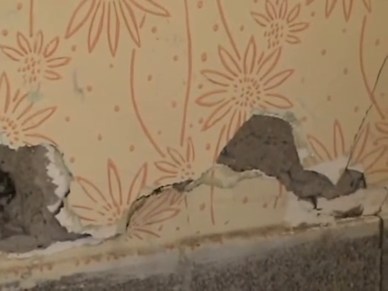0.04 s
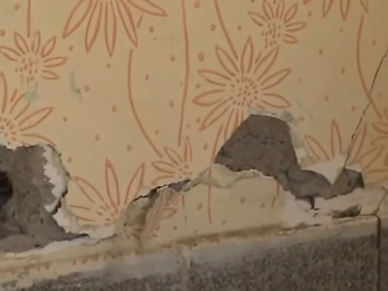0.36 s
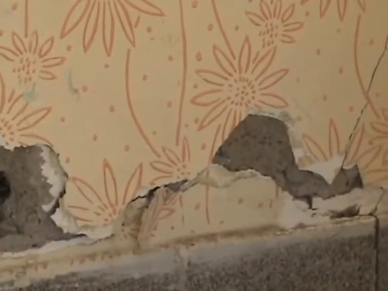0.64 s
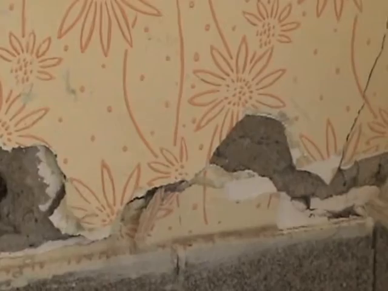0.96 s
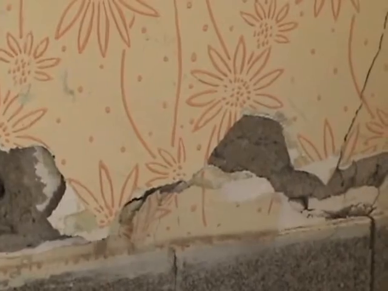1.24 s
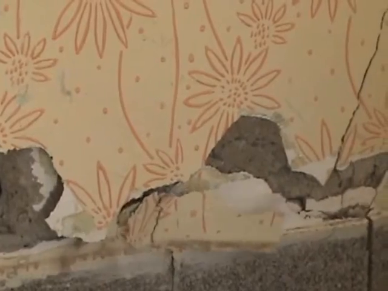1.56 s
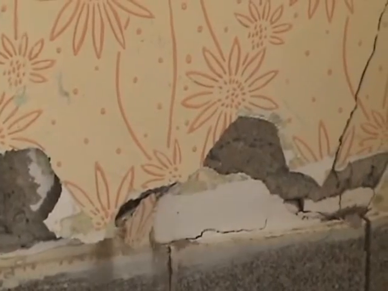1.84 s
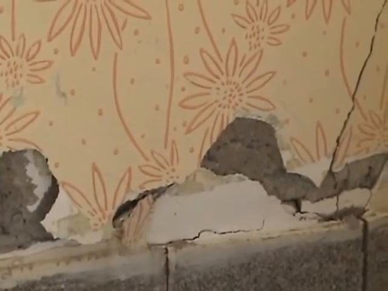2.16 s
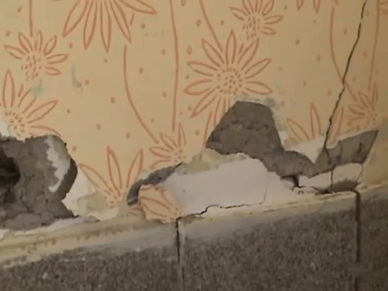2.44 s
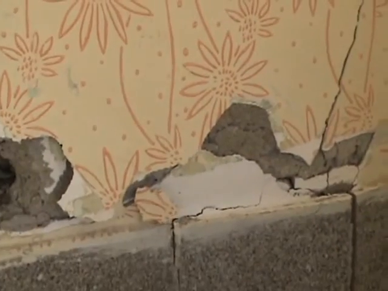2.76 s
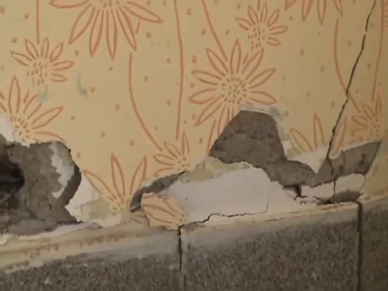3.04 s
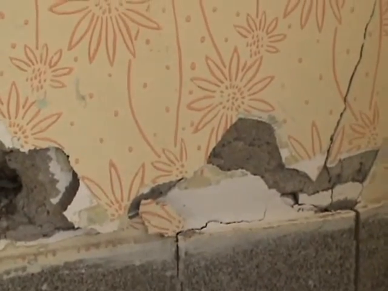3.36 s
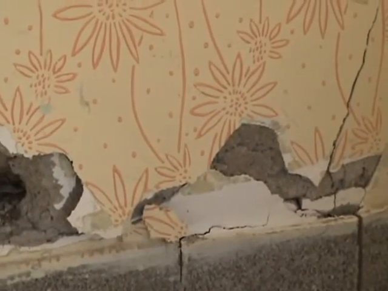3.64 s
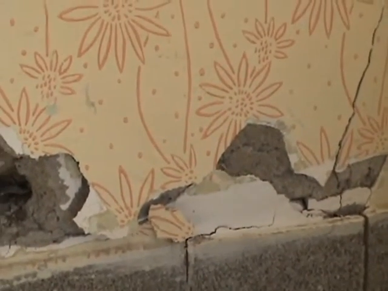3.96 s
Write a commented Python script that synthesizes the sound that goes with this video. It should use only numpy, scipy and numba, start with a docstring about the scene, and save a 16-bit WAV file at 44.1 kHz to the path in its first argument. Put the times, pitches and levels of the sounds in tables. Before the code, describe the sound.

A power chisel hammers plaster off a wall from the start, close by in a small bare room, its fast, even blows thumping, cracking and rattling. At about 2 seconds the blows stop, leaving a quieter motor whine and rush of air. After an instant of silence at 2.3 seconds, the hammering returns with deeper thumps and a brighter steel rattle, continuing to the end at about 4 seconds.

```python
"""Power chisel on plaster

Close to the microphone in a small bare room, a power chisel breaks plaster off a wall, about 26 blows a second.
Each blow thumps the wall, cracks the plaster and sets the steel bit rattling. The blows stop and the motor
whines on; then the scene changes, and the hammering is at another spot, deeper and more metallic."""
import sys
import numpy as np
from scipy import signal
from scipy.fft import rfft, irfft
from scipy.io import wavfile
from scipy.ndimage import uniform_filter1d
from numba import njit

SR = 44100
rng = np.random.default_rng(int(sys.argv[2]) if len(sys.argv) > 2 else 0)


def transcribe(u):
    """Save the signal u as a 16-bit wav file named by the first command-line argument.

    u: samples, shape (n,) or (channels, n), limited to [-1, 1]; the rate is SR.
    q: integer samples, one column per channel.
    """
    v = np.clip(np.atleast_2d(u).T, -1, 1)
    q = np.round(v * 32767).astype(np.int16)
    wavfile.write(sys.argv[1], SR, q)


N = 176400
LEAD = SR // 2  # the tool is already running when the scene opens
T = np.arange(-LEAD, N) / SR


# pace of the piston at the first spot (time [s], rate [blows/s])
FIRST_RATE = [(0, 25.8), (.7, 25.7), (1.0, 25.45), (1.35, 25.4), (1.62, 25.7), (1.8, 25.2), (1.95, 24.2)]
# strength of the blows there (time [s], thump [dB], crack [dB], rattle [dB])
FIRST_LEVELS = [(0, -17.5, -15.5, -25.5), (.55, -21, -16, -27), (.95, -14, -14.5, -27),
                (1.2, -15, -17, -27.5), (1.35, -16.5, -17, -24), (1.84, -15.5, -17, -25),
                (1.91, -19, -17.5, -20), (1.97, -25, -15.5, -28)]

def first_spell(stop_s=1.96):
    """Hard, even blows on plaster that booms more as it loosens; the bit rebounds once a stroke."""
    strokes = stroke_count(FIRST_RATE, beat_s=.030)
    running = T < stop_s
    thump_gain, crack_gain, rattle_gain = (undb(curve(FIRST_LEVELS, k)) * running for k in (1, 2, 3))
    hits = blows(strokes, jitter_s=.00017, scatter_db=1)
    cracks = blows(strokes, jitter_s=.0002, scatter_db=1.3)
    rebound = blows(strokes, jitter_s=.0005, scatter_db=7.5, delay=.4)
    thump = loosening_thump(hits + undb(-14) * rebound) * thump_gain
    grit = chatter(strokes, peak_at=.82, depth_db=0, grain_db=1.5)
    crack = plaster_crack(cracks + undb(-4) * rebound + undb(-7.5) * grit, FIRST_CRACK) * crack_gain
    sheet = sheet_ring(cracks + rebound) * running
    clack = tip_clack(strokes) * running
    contacts = unit(chatter(strokes, peak_at=.65, depth_db=7, grain_db=2.5) + undb(-7) * cracks)
    rattle = bit_rattle(contacts, FIRST_RATTLE, BIT_MODES[:3], ring_db=-10.5) * rattle_gain
    return (undb(1.5) * room(soften(thump), early_db=-7.5, late_db=-8.5, side_db=-7.5)
            + room(crack, early_db=7.5, late_db=4.5, side_db=-8.5)
            + room(soften(sheet), early_db=1.5, late_db=-11, side_db=-10)
            + room(soften(clack), early_db=-16.5, late_db=-6.5, side_db=-7)
            + undb(1.5) * room(rattle, early_db=-8.5, late_db=4.5, side_db=-8))


# pace of the piston at the second spot (time [s], rate [blows/s])
SECOND_RATE = [(2.36, 26.25), (2.68, 26.3), (2.87, 27), (3.05, 26.1), (3.6, 25.8), (3.85, 26.5)]
# strength of the blows there (time [s], thump [dB], crack [dB], rattle [dB])
SECOND_LEVELS = [(2.36, -16, -22.5, -18.5), (2.7, -15, -21.5, -19.5), (2.85, -15.5, -21, -17.5),
                 (3.55, -16, -22.5, -19.5), (4, -15, -21, -18)]

def second_spell():
    """The bit bounces on solid masonry: deep uneven thumps and a bright steel rattle."""
    strokes = stroke_count(SECOND_RATE, beat_s=2.365)
    thump_gain, crack_gain, rattle_gain = (undb(curve(SECOND_LEVELS, k)) for k in (1, 2, 3))
    hits = blows(strokes, jitter_s=.0003, scatter_db=1.7)
    rebound = blows(strokes, jitter_s=.0006, scatter_db=1, delay=.4)
    thump = masonry_thump(hits, rebound) * thump_gain
    grit = chatter(strokes, peak_at=.79, depth_db=2, grain_db=5)
    crack = plaster_crack(undb(-7.5) * hits + grit, SECOND_CRACK) * crack_gain
    contacts = chatter(strokes, peak_at=.64, depth_db=4, grain_db=4)
    rattle = bit_rattle(contacts, SECOND_RATTLE, BIT_MODES, ring_db=-10) * rattle_gain
    return (room(thump, early_db=-12.5, late_db=-15.5, side_db=1)
            + undb(.5) * room(crack, early_db=.5, late_db=2.5, side_db=-6)
            + room(rattle, early_db=-19, late_db=1, side_db=-7.5))


def stroke_count(rate, beat_s):
    """Running count of piston strokes, whole at each blow; one blow falls on beat_s."""
    strokes = np.cumsum(curve(rate)) / SR
    return strokes - np.interp(beat_s, T, strokes)


def blows(strokes, jitter_s, scatter_db, delay=0):
    """One pulse a stroke, uneven in time and force; delay is a fraction of a stroke."""
    due = np.flatnonzero(np.diff(np.floor(strokes - delay)))
    timing, force = rng.standard_normal((len(due), 2)).T
    landed = np.clip(due + (timing * jitter_s * SR).astype(int), 0, len(T) - 1)
    pulses = np.zeros(len(T))
    pulses[landed] = undb(scatter_db * force)
    return unit(pulses)


def chatter(strokes, peak_at, depth_db, grain_db):
    """Dense small contacts that swell and ebb once a stroke."""
    swell = undb(depth_db * np.cos(2 * np.pi * (strokes - peak_at)) + grain_db * walk(400))
    return unit(rng.standard_normal(len(T)) * swell)


# wall modes (frequency [Hz], t60 [s], firm plaster [dB], loose plaster [dB], second spot [dB])
WALL_MODES = [(101.6, 0.57, 0.5, -3, 1.5), (133, 0.084, -34, -16, -1), (155.3, 0.6, -2.5, -2.5, -15),
              (186.4, 0.14, -1.5, -11, 2.5), (202.6, 0.16, 1, 4.5, 1), (229.3, 0.23, -5, 0.5, -5),
              (258.3, 0.094, 3.5, 1, -4), (282.7, 0.2, 0, -4, -7), (336.5, 0.36, -4, -4.5, -16),
              (467, .15, -10, -14, -39)]
# spectrum of the low rumble (frequency [Hz], level [dB])
RUMBLE = [(20, -16.5), (45, -12), (75, 1.5), (130, 7), (250, 3), (450, -18.5), (1500, -57), (5000, -100)]

def loosening_thump(pulses, loosens_s=(.49, .81)):
    """The wall booms over a rumble; its modes shift in balance as the plaster loosens."""
    loosened = np.interp(T, loosens_s, (0, 1))
    mode_db = [firm + loosened * (loose - firm) for _, _, firm, loose, _ in WALL_MODES]
    return wall_ring(pulses, mode_db) + undb(-12.5) * noise(RUMBLE)


def masonry_thump(hits, rebound):
    """Blow and rebound ring the wall almost equally hard, over a pulsing rumble."""
    boom = wall_ring(hits + undb(-.5) * rebound, [row[-1] for row in WALL_MODES])
    rumble = colour(hits + undb(3) * rng.standard_normal(len(T)), RUMBLE)
    return boom + undb(-6) * rumble


def wall_ring(pulses, mode_db, low_hz=91.8):
    """The wall's low modes, each at its own level; it radiates little below low_hz."""
    modes = sum(undb(db) * ring(pulses, hz, t60) for (hz, t60, *_), db in zip(WALL_MODES, mode_db))
    return unit(signal.sosfilt(signal.butter(4, low_hz, "high", fs=SR, output="sos"), modes))


# spectrum of breaking plaster at each spot (frequency [Hz], level [dB])
FIRST_CRACK = [(180, -41), (300, -2.5), (453, -3), (655, -2), (1040, -7), (1770, -6.5), (3550, -24),
               (4000, -20), (5200, -27.5), (8800, -120)]
SECOND_CRACK = [(280, -33), (480, 2.5), (578, -2), (1160, -4), (1260, -7), (1920, 0.5), (2090, -5),
                (4000, -6.5), (5200, -24), (8800, -120)]

def plaster_crack(contacts, spectrum):
    """Plaster breaks under the tip: each contact is a short midrange burst."""
    return colour(unit(contacts), spectrum)


# spectrum of the rattling bit at each spot (frequency [Hz], level [dB])
FIRST_RATTLE = [(1650, -16), (2800, -2.5), (3570, -7), (4280, -4.5), (5420, -4.5), (8010, -8),
                (12500, -26.5), (14000, -36.5)]
SECOND_RATTLE = [(1410, -10), (2400, -5), (3790, -7.5), (4240, 1), (4910, -3.5), (7210, -3.5), (8290, -7.5),
                 (9470, -17), (12300, -19.5), (14000, -39)]
# modes of the steel bit (frequency [Hz], t60 [s], level [dB])
BIT_MODES = [(2015, 0.14, -6), (4293, 0.038, -4), (4376, 0.033, 0.5), (6570, 0.0053, 2.5),
             (7300, 0.017, -2.5), (8130, 0.058, 3)]

def bit_rattle(contacts, spectrum, modes, ring_db):
    """Small contacts make a bright clatter and set the steel ringing."""
    return colour(contacts, spectrum) + undb(ring_db) * struck(contacts, modes)


# modes of the plaster sheet (frequency [Hz], t60 [s], level [dB])
SHEET_MODES = [(571, 0.026, 4.5), (818, 0.021, -16.5), (914, 0.054, 6), (1054, 0.044, 5.5),
               (1165, 0.044, -10.5)]
# strength of its ring (time [s], level [dB])
SHEET_LEVELS = [(0, -18), (.25, -17.5), (.55, -18.5), (.75, -24.5), (1.1, -16.5), (1.4, -43), (1.93, -42)]

def sheet_ring(pulses):
    """The plaster sheet rings hollow while it is still whole."""
    return struck(pulses, SHEET_MODES) * undb(curve(SHEET_LEVELS))


# modes of the tip's clack (frequency [Hz], t60 [s], level [dB])
CLACK_MODES = [(1400, 0.005, -8), (1740, 0.0082, 6), (2150, 0.0052, 5), (3300, 0.0033, -8)]
# strength of the clack (time [s], level [dB])
CLACK_LEVELS = [(0, -17.5), (.2, -17), (.45, -18.5), (.8, -19.5), (1.15, -22), (1.35, -23), (1.87, -24),
                (1.94, -31)]

def tip_clack(strokes):
    """The tip meets hard plaster with a clack that dies in milliseconds."""
    hits = blows(strokes, jitter_s=.00015, scatter_db=3)
    return -struck(hits, CLACK_MODES) * undb(curve(CLACK_LEVELS))


def soften(x, contact_hz=4800):
    """Plaster is soft: the contact rounds the blow and leaves little above contact_hz."""
    return signal.sosfilt(signal.butter(4, contact_hz, fs=SR, output="sos"), x)


# tones of the motor (frequency [Hz], level [dB])
MOTOR_TONES = [(1394, -42), (1943, -47), (2815, -67)]
# spectrum of its cooling air (frequency [Hz], level [dB])
COOLING_AIR = [(47, -63), (80, -63), (251, -24), (405, -30), (1050, -24.5), (1140, -38), (1360, -11.5),
               (1610, -20.5), (4080, -22.5), (14000, -54.5)]

def motor():
    """Cooling air and a slightly unsteady whine, bare once the blows stop."""
    turning = np.cumsum(1 + .0029 * walk(24.2)) / SR
    whine = sum(undb(db) * np.sqrt(2) * np.sin(2 * np.pi * hz * turning) for hz, db in MOTOR_TONES)
    air = undb(-32) * noise(COOLING_AIR)
    return whine + room(air, early_db=-16, late_db=-6, side_db=-3)


def room(x, early_db, late_db, side_db, t60_s=.69, build_s=.0015, early_s=.027):
    """At the microphone, in stereo: direct sound, dense echoes from the near walls and a long tail."""
    t = np.arange(LEAD) / SR
    early = undb(early_db) * np.exp(-t / early_s) * np.sqrt(2 / (early_s * SR))
    fall = np.log(1000) / t60_s
    late = undb(late_db) * np.exp(-t * fall) * np.sqrt(2 * fall / SR)
    mid, side = rng.standard_normal((2, LEAD)) * np.hypot(early, late) * (1 - np.exp(-t / build_s))
    mid[0] = 1  # the direct sound
    response = (mid + undb(side_db) * side * np.array([[1], [-1]])) / np.linalg.norm(mid)
    return signal.fftconvolve(x[None], response, axes=1)[:, :len(x)]


def struck(x, modes):
    """The ringing of one object, at rms 1."""
    return unit(sum(undb(db) * ring(x, hz, t60) for hz, t60, db in modes))


def ring(x, hz, t60):
    """One decaying mode, at rms 1."""
    pole = np.exp((2j * np.pi * hz - np.log(1000) / t60) / SR)
    return unit(signal.lfilter([1], [1, -pole], x + 1e-18).imag)


def noise(spectrum):
    """Steady noise with the given spectrum."""
    return colour(rng.standard_normal(len(T)), spectrum)


def colour(x, spectrum, size=4096):
    """Causal filter of unit energy with the given spectral shape."""
    cepstrum = irfft(np.log(undb(over_hz(spectrum, size))))
    cepstrum[1:size // 2] *= 2  # fold to minimum phase
    cepstrum[size // 2 + 1:] = 0
    response = irfft(np.exp(rfft(cepstrum)))
    return signal.fftconvolve(x, response / np.linalg.norm(response))[:len(x)]


def walk(rate_hz):
    """Smooth random drift with a spread near 1."""
    hold = int(SR / rate_hz)
    steps = np.repeat(rng.standard_normal(len(T) // hold + 1), hold)
    return uniform_filter1d(steps, hold)[:len(T)]


def curve(rows, column=1):
    """One column of a table, joined by straight lines in time."""
    rows = np.array(rows)
    return np.interp(T, rows[:, 0], rows[:, column])


def over_hz(points, size):
    """(Hz, value) points spread over the bins of a transform."""
    hz, value = np.array(points).T
    return np.interp(np.log(np.arange(size // 2 + 1) * SR / size + 1), np.log(hz), value)


def undb(db):
    """Decibels to gain."""
    return 10 ** (np.asarray(db) / 20)


def unit(x):
    """Scale to rms 1."""
    return x / np.sqrt(np.mean(x ** 2))


@njit
def follow(x, attack, release):
    """Peak follower that rises fast and falls slowly."""
    out, level = np.empty(len(x)), 0.
    for i in range(len(x)):
        level += (x[i] - level) * (attack if x[i] > level else release)
        out[i] = level
    return out


def limiter(x, threshold=.84, attack_s=.00018, release_s=.019, lookahead_s=.0004):
    """Both channels duck together just ahead of each peak."""
    peak = follow(np.abs(x).max(axis=0), 1 / (1 + attack_s * SR), 1 / (1 + release_s * SR))
    gain = threshold / np.maximum(peak, threshold)
    ahead = int(lookahead_s * SR)
    return x * uniform_filter1d(np.roll(gain, -ahead), ahead)


def scene(silent_s=(2.302, 2.333), fade_in_s=.021):
    """Two spells of hammering over a faint rumble; the scene changes between them, with a brief drop-out."""
    before = np.clip((silent_s[0] - T) * SR / 40, 0, 1)  # a 40-sample fade
    after = np.clip((T - silent_s[1]) / fade_in_s, 0, 1)
    hush = undb(-59) * noise(RUMBLE)
    mix = first_spell() * before + second_spell() * after + motor() * (before + after) + hush
    return mix[:, LEAD:]


# left channel against the right (frequency [Hz], phase lead [rad])
STEREO_PHASE = [(30, -.3), (100, -.7), (260, -1.2), (520, -1.15), (1100, -.8), (2500, -.25), (3800, -.35),
                (6500, 0)]
# left channel minus right (frequency [Hz], level [dB])
STEREO_BALANCE = [(100, .8), (700, -.3), (2000, 0), (4400, 1), (8000, 2), (13000, .5)]

def record(dry, top_hz=14600):
    """The two channels differ in phase and level, most strongly at low frequencies; peaks are limited, the top
    is cut."""
    lead, tilt = over_hz(STEREO_PHASE, N), over_hz(STEREO_BALANCE, N)
    sides = np.array([[1], [-1]]) / 2
    spread = undb(sides * tilt) * np.exp(1j * sides * lead) / np.cos(lead / 2)
    heard = irfft(rfft(dry) * spread, N)
    return signal.sosfilt(signal.ellip(8, .2, 80, top_hz, fs=SR, output="sos"), limiter(heard))


dry = scene()
out = record(dry)
transcribe(out)
```